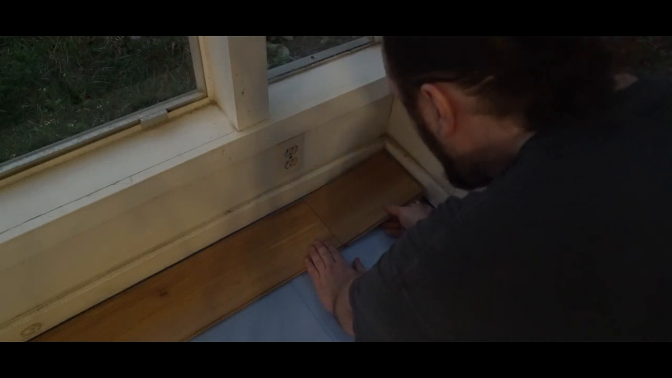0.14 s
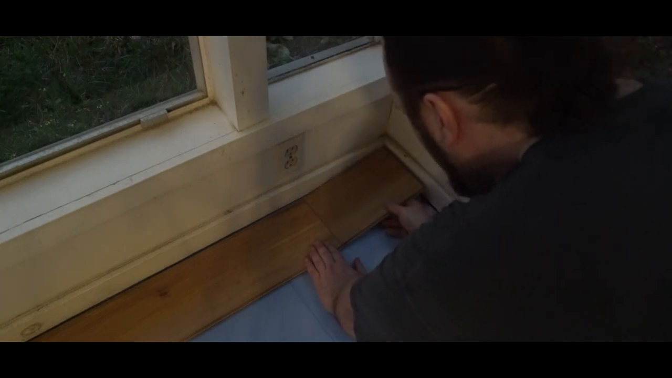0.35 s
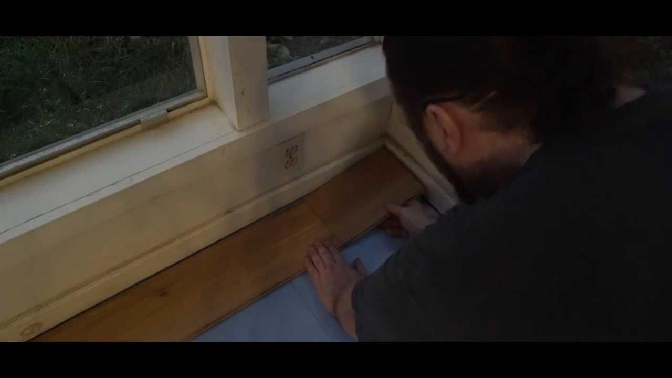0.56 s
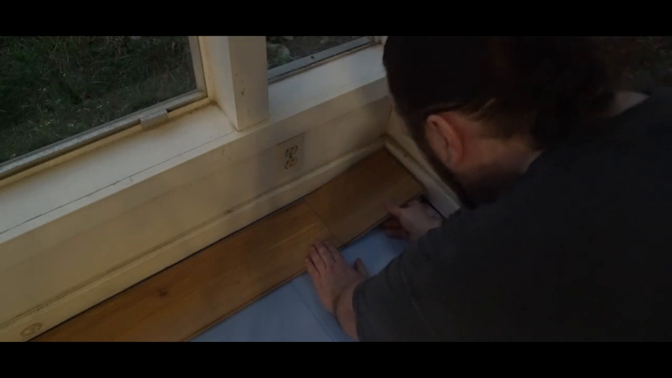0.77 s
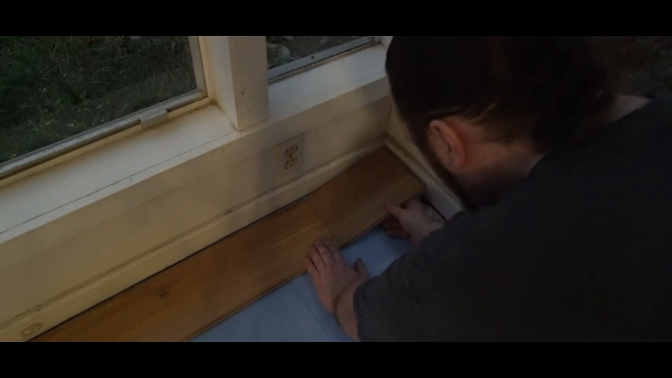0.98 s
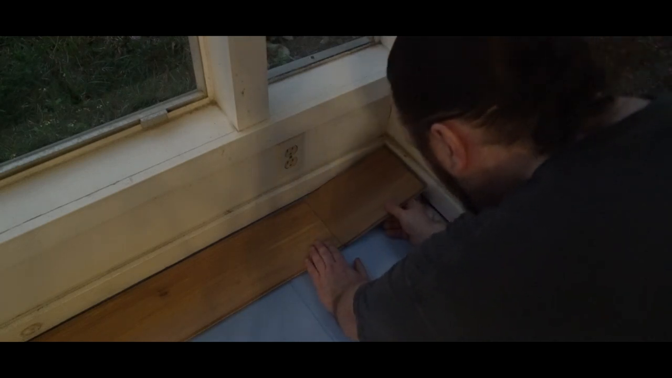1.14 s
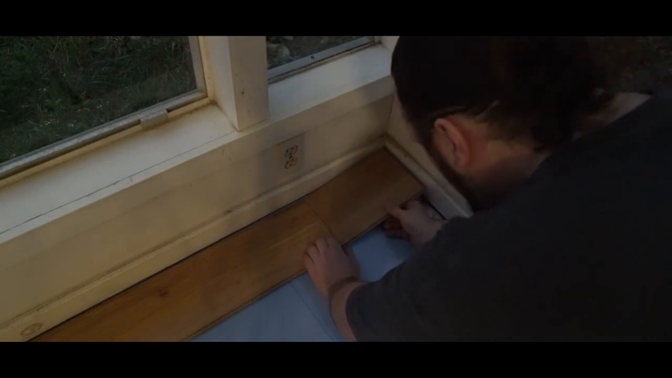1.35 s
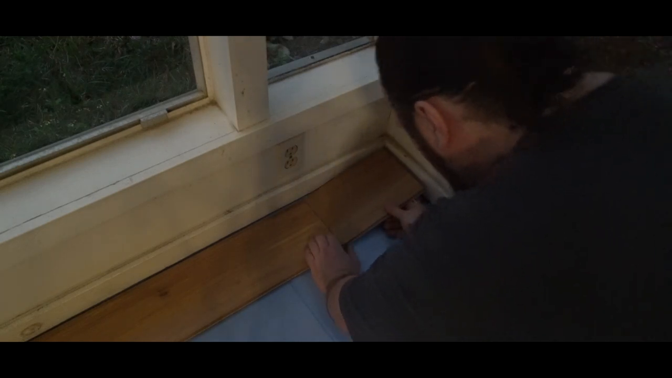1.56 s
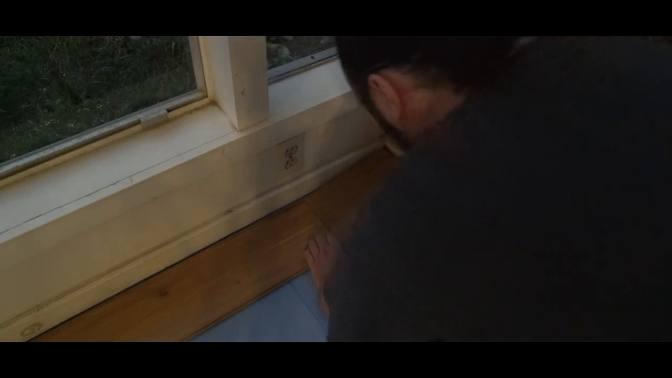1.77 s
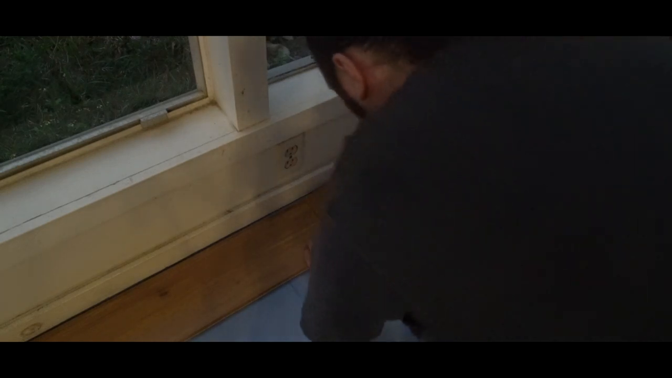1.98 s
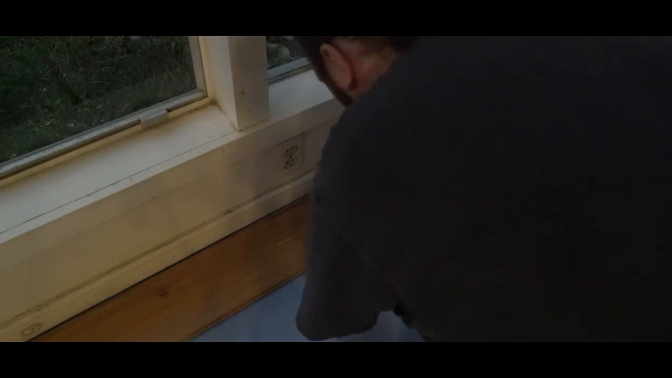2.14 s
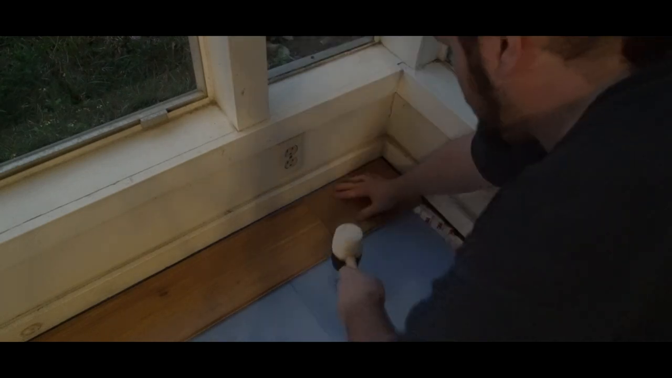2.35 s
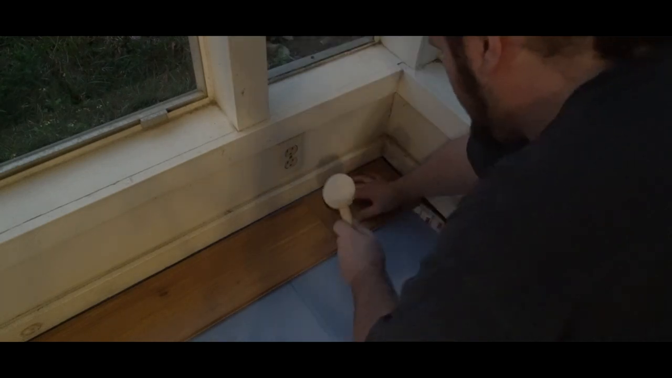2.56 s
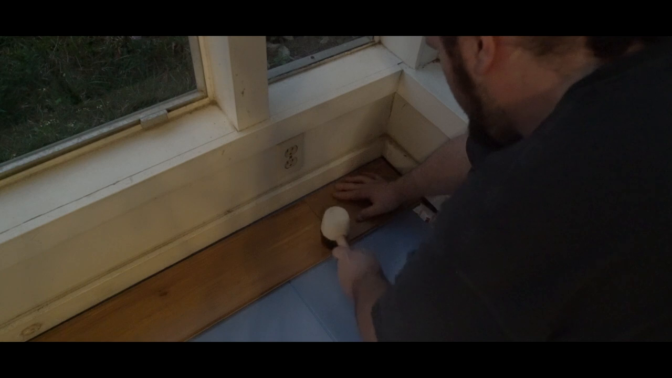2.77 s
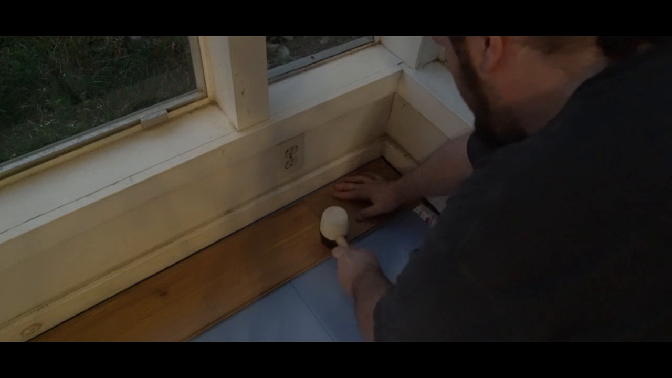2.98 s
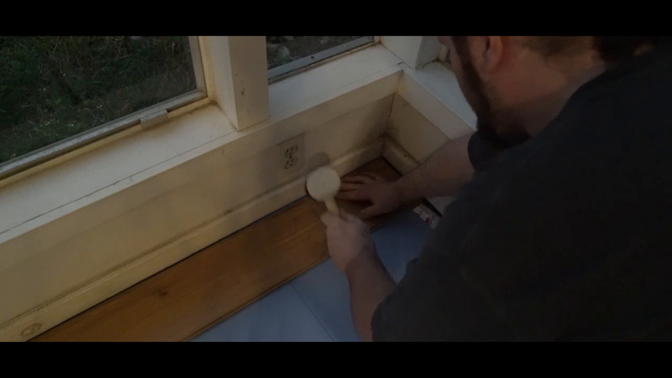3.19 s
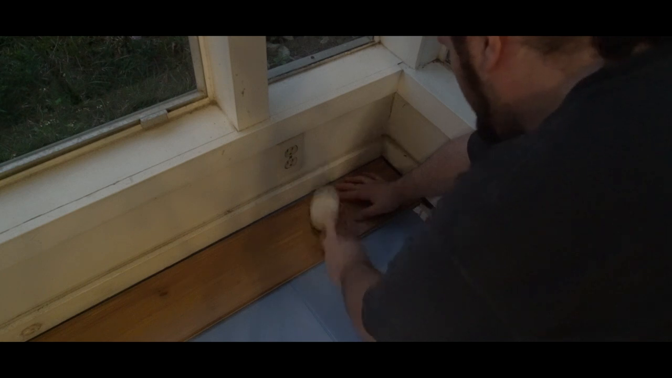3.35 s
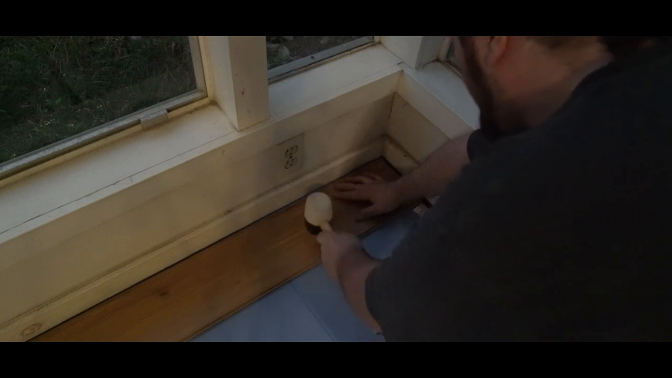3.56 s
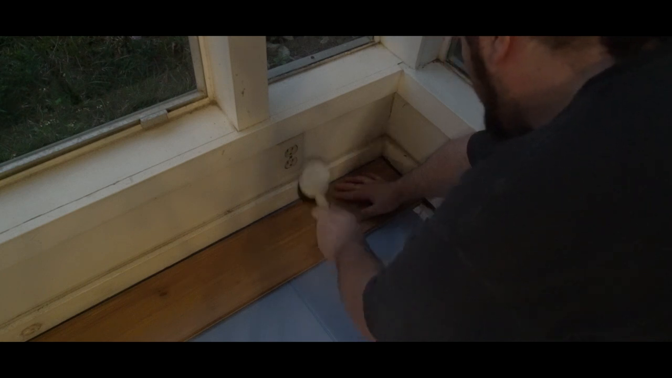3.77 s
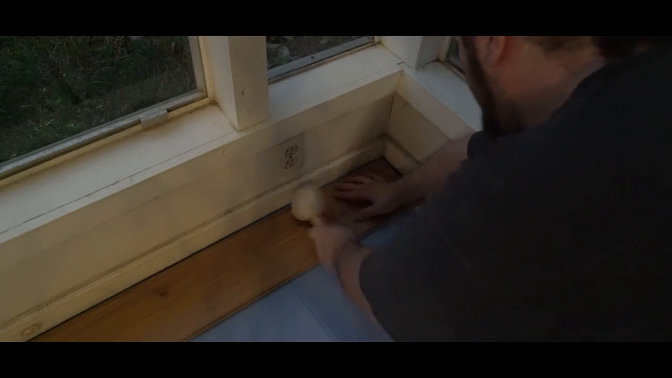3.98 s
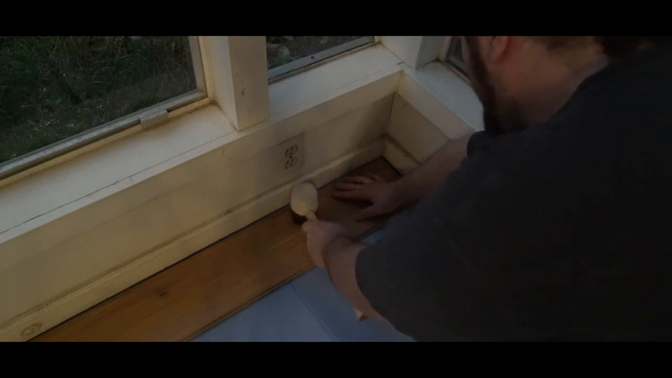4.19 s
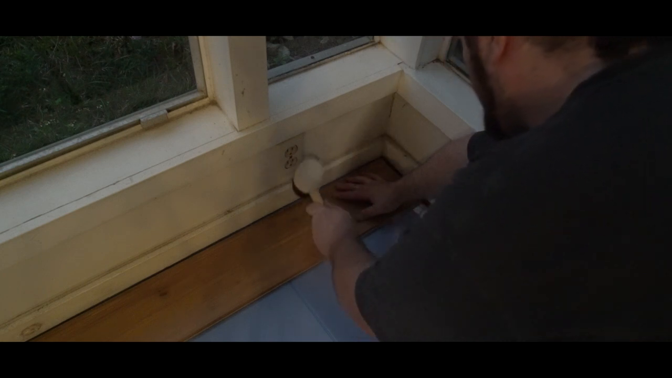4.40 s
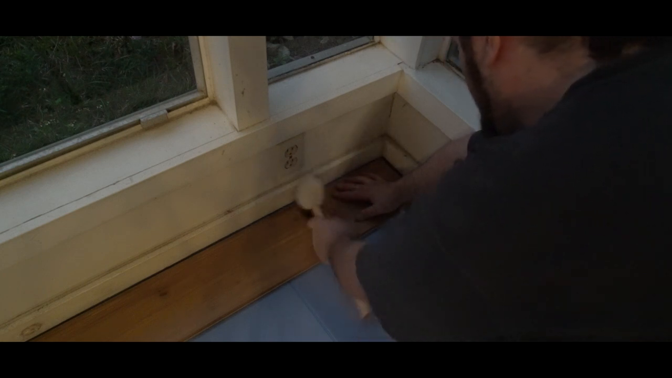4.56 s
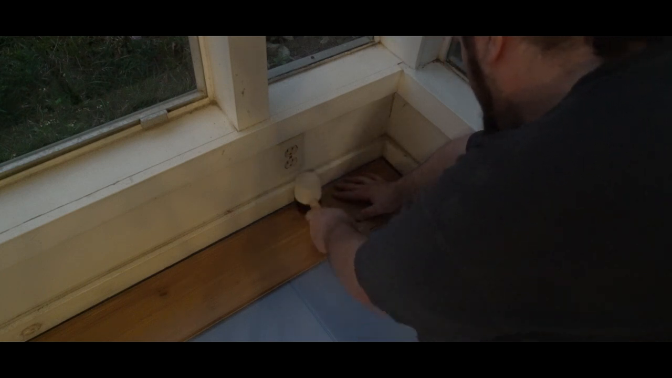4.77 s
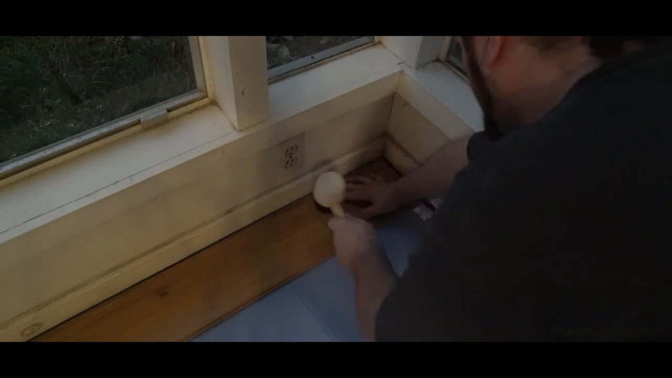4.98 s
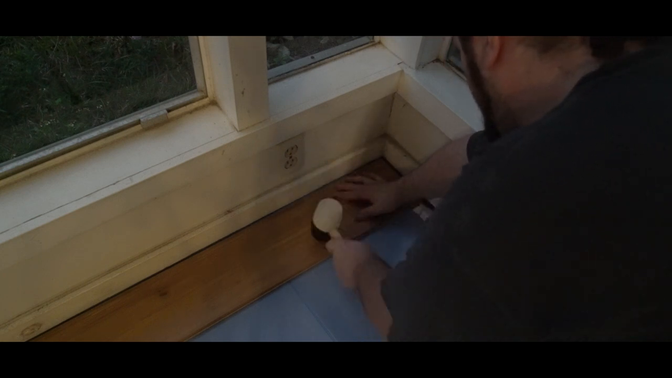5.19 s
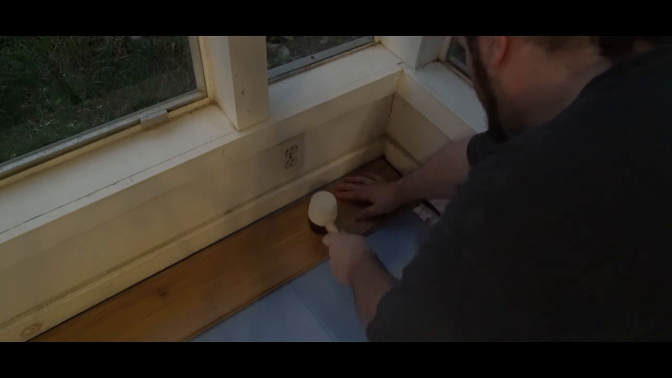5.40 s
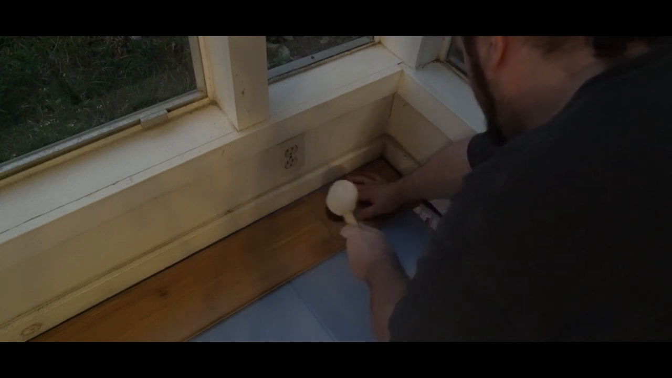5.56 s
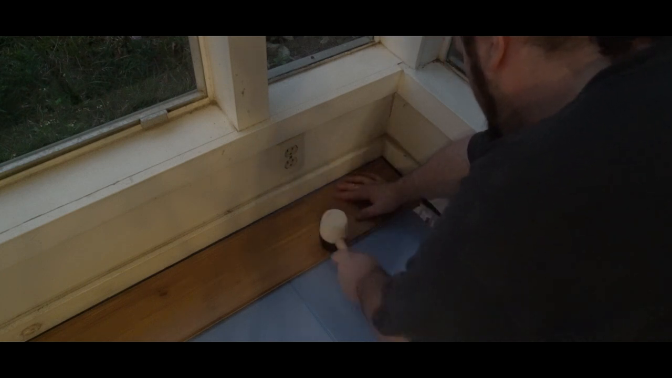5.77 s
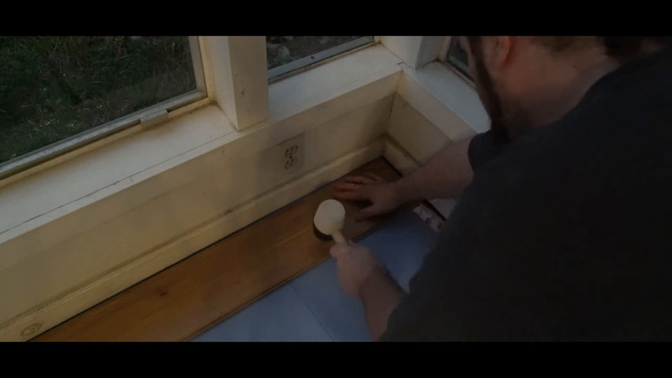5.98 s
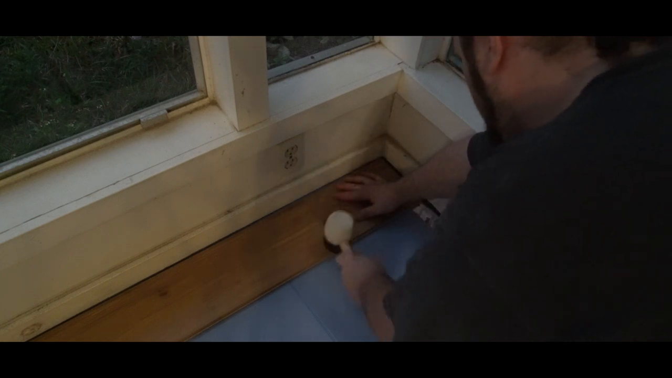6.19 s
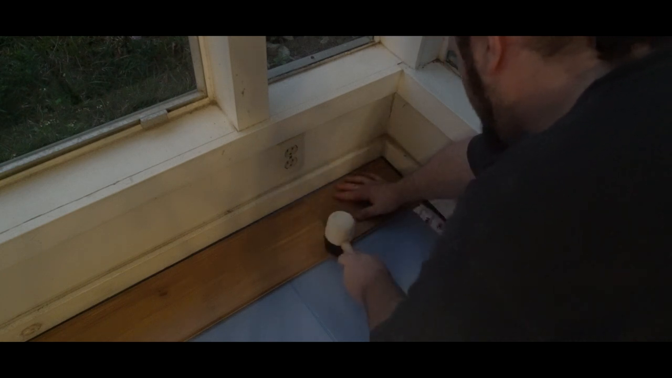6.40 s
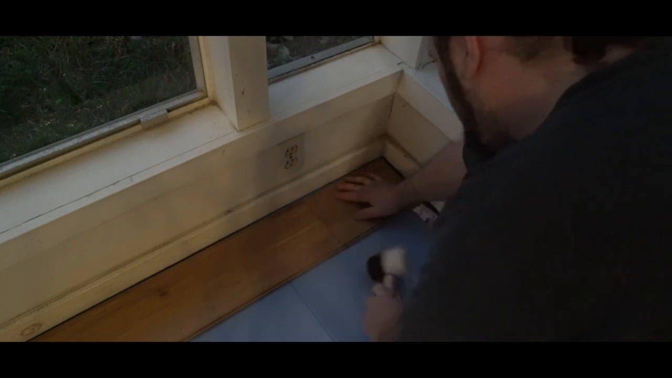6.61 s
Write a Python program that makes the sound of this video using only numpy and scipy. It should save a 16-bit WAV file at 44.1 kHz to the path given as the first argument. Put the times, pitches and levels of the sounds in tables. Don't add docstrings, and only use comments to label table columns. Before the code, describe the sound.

Quiet handling comes first: plank friction squeaks, soft knee thuds, rustling clothes and light wooden ticks over low room tone. Then seven mallet blows on the plank dominate, each a dry, hollow knock with quick corner echoes, wall flutter and a reverberant tail over half a second long. The early blows crack sharply; later ones are weaker and boomier. Recorded close in a hard empty room, the loudest peaks squashed.

```python
import sys
import numpy as np
from scipy import signal
from scipy.fft import rfft, irfft
from scipy.io import wavfile

SR = 44100
rng = np.random.default_rng(int(sys.argv[2]) if len(sys.argv) > 2 else 0)


def dump_mix(stems):
    frames = np.atleast_2d(stems).T
    limited = np.clip(frames, -1, 1)
    pcm = np.round(limited * 32767).astype(np.int16)
    wavfile.write(sys.argv[1], SR, pcm)


def decibels_to_gain(level_db):
    exponent = np.asarray(level_db, float) / 20
    return 10 ** exponent


N = 292779
DROP_S = 2.345


def rms_one(x):
    return x / np.sqrt(np.mean(x ** 2) + 1e-20)


def at_hz(points, hz):
    points = np.array(points)
    return np.interp(np.log(hz), np.log(points[:, 0]), points[:, 1])


def bins_hz(x):
    return np.maximum(np.fft.rfftfreq(len(x), 1 / SR), 1)


def butter(x, order, hz, kind="low"):
    return signal.sosfilt(signal.butter(order, hz, kind, fs=SR, output="sos"), x)


def steep_low(x, hz, order=10, stop_db=40):
    return signal.sosfilt(signal.cheby2(order, stop_db, hz, fs=SR, output="sos"), x)


def ring(force, hz, t60):
    r, w = decibels_to_gain(-60 / (t60 * SR)), 2 * np.pi * hz / SR
    return signal.lfilter([0, np.sin(w)], [1, -2 * r * np.cos(w), r * r], force + 1e-18)


def drone(hz, width_hz):
    return rms_one(ring(rng.standard_normal(N), hz, np.log(1000) / np.pi / width_hz))


def drift(rate_hz):
    return rms_one(butter(rng.standard_normal(N + SR), 2, rate_hz)[SR:])


def coloured(spectrum, white):
    return rms_one(irfft(rfft(white) * decibels_to_gain(at_hz(spectrum, bins_hz(white))), len(white)))


def add(out, x, s):
    i = round(s * SR)
    out[i:i + len(x)] += x[:N - i]


# (frequency [Hz], density [dB per Hz])
AIR = [(20, -21.5), (45, -17.5), (75, -15), (120, -13), (300, -16.5), (520, -27), (720, -14), (800, -23),
       (2000, -26), (5000, -32.5), (9000, -37), (13000, -36), (15600, -39), (16000, -52.5)]
# (frequency [Hz], width [Hz], level [dB])
FAN = [(57, 9, -79), (402, 65, -74.5), (662, 58, -73)]
AIR_DB, AIR_LATE_DB = -70.5, -75.5
HUM_HZ, HUM_DB = 59.5, -70.5


def room_tone():
    t = np.arange(N) / SR
    level_db = np.where(t < DROP_S, AIR_DB, AIR_LATE_DB)
    air = coloured(AIR, rng.standard_normal(N))
    fan = sum(decibels_to_gain(db - AIR_DB) * drone(hz, width_hz) for hz, width_hz, db in FAN)
    hum = decibels_to_gain(HUM_DB - AIR_DB + 1.5 * drift(4)) * np.sin(2 * np.pi * HUM_HZ * t)
    return decibels_to_gain(level_db) * (air + fan + hum)


HANDLING_DROP_DB = 14


def gestures(rows, attack_s, release_db_per_s, rest_db, second=False):
    t, power = np.arange(N) / SR, decibels_to_gain(2 * rest_db)
    for s, length_s, db, other_db in rows:
        rise = np.clip((t - s) / attack_s, 0, 1)
        fall_db = release_db_per_s * np.maximum(t - s - length_s, 0)
        power = power + (rise * decibels_to_gain(db + second * other_db - fall_db)) ** 2
    return np.sqrt(power) * decibels_to_gain(-HANDLING_DROP_DB * (t > DROP_S))


SLIDE_SAG = .07


def sagging(x):
    t, pace = np.arange(N) / SR, np.ones(N)
    for s, length_s, *_ in SLIDES:
        pace += SLIDE_SAG * (.5 - (t - s) / length_s) * (t >= s) * (t < s + length_s)
    return np.interp(np.cumsum(pace), np.arange(N), x)


def sliding_voice(modes):
    voice = np.zeros(N)
    for hz, width_hz, db in modes:
        voice += decibels_to_gain(db + 2.6 * drift(5.8) + 1.5 * drift(18)) * drone(hz, width_hz)
    return voice


# (time [s], length [s], bright level [dB], dull against bright [dB])
SLIDES = [
    (0, 0.11, -69, -14),
    (0.198, 0.083, -76.5, -13),
    (0.407, .06, -75, -12),
    (0.505, .11, -76.5, -7),
    (1.004, 0.13, -79.5, -1),
    (1.26, 0.073, -71.5, -6),
    (1.596, 0.057, -74, -5),
    (1.919, 0.056, -77, -7),
    (2.03, 0.2, -82.5, 3.5),
]
# (time [s], length [s], cloth level [dB], knee against cloth [dB])
SHIFTS = [
    (.02, 0.065, -88, 9),
    (.82, .04, -100, 23),
    (1.22, 0.033, -71.5, -12),
    (1.27, .03, -75, 13.5),
    (1.3, 0.025, -68, 7),
    (1.92, 0.065, -80.5, 1),
    (2.0, 0.26, -88, 6),
    (2.35, .08, -71.5, -12),
]
# (frequency [Hz], width [Hz], level [dB])
BRIGHT_SLIDE = [(1390, 230, -4.5), (3300, 130, -0.5), (4130, 220, 0.5), (4670, 150, -10)]
DULL_SLIDE = [(1090, 53, 1), (2300, 70, 2), (3250, 200, -8.5)]
# (frequency [Hz], density [dB per Hz])
CLOTH = [(530, -41), (900, -36.5), (1660, -11), (1810, -14.5), (2450, -13.5), (2660, -13), (5550, -8.5),
         (16000, -35)]
KNEE = [(71, -46), (120, -11), (199, -1), (265, 3.5), (418, 3), (470, 6.5), (900, -16.5), (1170, -15),
        (1980, -120)]
SLIDE_ATTACK_S, SLIDE_RELEASE_DB_PER_S, SLIDE_REST_DB, DULL_REST_DB = 0.013, 90, -90.5, -93.5
SHIFT_ATTACK_S, SHIFT_RELEASE_DB_PER_S, CLOTH_REST_DB, KNEE_REST_DB = 0.0056, 87, -85.5, -83
CLOTH_FOLLOWS_SLIDE_DB = -13


def handling():
    bright, dull = sliding_voice(BRIGHT_SLIDE), sliding_voice(DULL_SLIDE)
    grains = rng.standard_normal(N) * decibels_to_gain(1.3 * rng.exponential(1, N))
    cloth = coloured(CLOTH, grains) * decibels_to_gain(8.5 + 1.0 * drift(25))
    knee = coloured(KNEE, rng.standard_normal(N))
    slide = SLIDES, SLIDE_ATTACK_S, SLIDE_RELEASE_DB_PER_S
    shift = SHIFTS, SHIFT_ATTACK_S, SHIFT_RELEASE_DB_PER_S
    bright_gain = gestures(*slide, SLIDE_REST_DB)
    dull_gain = gestures(*slide, DULL_REST_DB, second=True)
    cloth_gain = np.hypot(gestures(*shift, CLOTH_REST_DB), decibels_to_gain(CLOTH_FOLLOWS_SLIDE_DB) * bright_gain)
    knee_gain = gestures(*shift, KNEE_REST_DB, second=True)
    return bright_gain * sagging(bright) + dull_gain * dull + cloth_gain * cloth + knee_gain * knee


# (frequency [Hz], density [dB per Hz])
ROOM_COLOUR = [(45, -52.5), (112, -18.5), (172, -10.5), (286, 0), (420, 4), (520, 1.5), (750, 6),
               (1200, 5.5), (2400, 0.5), (4500, -2), (7200, -17.5), (10500, -33.5), (14000, -47),
               (15500, -71)]
# (frequency [Hz], t60 [s])
ROOM_T60 = [(60, 0.168), (160, 0.71), (420, 0.74), (1100, 0.7), (2900, 0.81), (5500, 0.71), (8000, 0.57),
            (11000, 0.49), (14500, 0.4)]
# (frequency [Hz], level [dB], t60 [s])
ROOM_MODES = [(76.6, -24.5, 0.61), (152.6, -22.5, 0.35), (182.4, -23, 0.52), (331.8, -13, 0.68),
              (404, -13.5, 0.64), (526.6, -16.5, 0.53), (617, -16.5, 0.77), (699, -15.5, 0.71),
              (720, -15.5, 0.72), (840, -10, 0.31), (1067, -17.5, 0.25), (984, -14, 0.76),
              (1655, -19.5, 0.91)]
FLUTTER_S, FLUTTER_DB = .0197, 0.5
NEAR_PITCH_DB, NEAR_PITCH_OCTAVES = 3, 0.33


def room_response(white, slap_hz, thud_db, pitch_hz, lift_db, slap_db, crack_db, boom_db=0):
    n, t, hz = len(white), np.arange(len(white)) / SR, bins_hz(white)
    colour_db = at_hz(ROOM_COLOUR, hz)
    colour_db += lift_db * np.exp(-(np.log2(hz / pitch_hz) / 0.2) ** 2)
    colour_db += slap_db * np.exp(-(np.log2(hz / slap_hz) / 0.13) ** 2)
    tilt = [(170, boom_db), (300, thud_db), (600, 0.011), (1200, 0.0044), (6000, crack_db), (14000, crack_db)]
    colour_db += at_hz(tilt, hz)
    spectrum = rfft(white) * decibels_to_gain(colour_db)
    spectrum /= np.sqrt(2 * np.sum(np.abs(spectrum) ** 2)) / n
    out = np.zeros(n)
    for centre_hz in 40 * 2 ** np.arange(0, 9.1, .5):
        share = np.clip(1 - 2 * np.abs(np.log2(hz / centre_hz)), 0, 1)
        out += irfft(spectrum * share, n) * decibels_to_gain(-60 * t / at_hz(ROOM_T60, centre_hz))
    out *= decibels_to_gain(FLUTTER_DB * np.cos(2 * np.pi * (t - .013) / FLUTTER_S) * np.exp(-t / 0.71))
    for mode_hz, level_db, t60 in ROOM_MODES:
        wave = np.sin(2 * np.pi * (mode_hz * t + rng.random()))
        near_db = NEAR_PITCH_DB * np.exp(-(np.log2(mode_hz / pitch_hz) / NEAR_PITCH_OCTAVES) ** 2)
        drive_db = boom_db if mode_hz < 200 else thud_db
        out += decibels_to_gain(level_db + near_db + drive_db + rng.uniform(-6.0, 2.25) - 60 * t / t60) * wave
    return out * (1 - np.exp(-(t / 0.0014) ** 2))


# (time [s], peak [dB], pitch [Hz], tick [dB], rattle length [s])
NUDGES = [(0.079, -53, 1300, -15, 0.0036), (0.947, -72, 4200, 16.5, 0.0025),
          (1.017, -44.5, 1500, -31, 0.0061), (1.074, -45.5, 1390, -16, 0.0078),
          (1.226, -61, 3300, -7, 0.0043), (1.31, -74, 3300, -4, .004), (1.583, -41.5, 1490, -39, 0.012),
          (1.618, -53, 1500, -18, 0.014), (1.938, -59, 1500, -11, .006), (2.4, -73.5, 4030, 6, 0.0034),
          (2.521, -60.5, 2500, -22, 0.0047), (3.348, -55, 4200, -4, 0.0091), (5.47, -64, 4230, 6, 0.002),
          (5.59, -71, 4200, 7, 0.003), (6.625, -69.5, 4200, 6, 0.0046)]
# (frequency [Hz], level [dB], t60 [s])
LOOSE_PLANK = [(980, -13.5, 0.02), (1390, -6, 0.021), (1570, -3.5, 0.0082), (1890, -16.5, 0.01),
               (2290, -10.5, 0.0096), (2970, -4.5, 0.0076), (3330, -3.5, .012), (4334, -13.5, 0.024)]


def nudges():
    out, t = np.zeros(N), np.arange(SR // 5) / SR
    tail = room_response(rng.standard_normal(SR // 2), 3300, -14.0, 1000, 0, 0, 0)
    for s, peak_db, pitch_hz, tick_db, length_s in NUDGES:
        rattle = rng.standard_normal(len(t)) * np.exp(-(t / length_s) ** 2)
        body = np.zeros(len(t))
        for hz, db, t60 in LOOSE_PLANK:
            body += ring(rattle, hz, t60) * decibels_to_gain(db - 6 * abs(np.log2(hz / pitch_hz)))
        body = butter(body, 2, 700, "high")
        tick = butter(rattle, 2, [4000, 11000], "band")
        tap = decibels_to_gain(peak_db) * (body / np.abs(body).max() + decibels_to_gain(tick_db) * tick)
        add(out, tap, s)
        add(out, decibels_to_gain(-7.5) * tap, s + CORNER[1][0])
        add(out, decibels_to_gain(-50.0) * signal.fftconvolve(tap, tail), s)
    return out


# (frequency [Hz], level [dB], t60 [s], share of hardness [ratio])
PLANK = [(177.3, -16.5, 0.073, 0), (342, -19.5, 0.011, 0.24), (628, -7, 0.016, 0), (1300, -3, 0.0079, 0.42),
         (2140, -7, 0.0025, 0.5), (3155, -15.5, 0.016, 0.85), (4050, -14, 0.0038, 0),
         (5030, -11, 0.0049, 0.033), (6070, -7, 0.0035, 0.09), (7650, -12.5, 0.0055, 0.55)]
OVERTONE_HZ = 1705


def blow(pitch_hz, slap_hz, hard_db, click_db, top_hz):
    t = np.arange(SR // 5) / SR
    chatter = rng.standard_normal(len(t)) * np.exp(-t / 0.00082)
    force = 0.26 * decibels_to_gain(hard_db) * butter(chatter, 2, [2500, 6500], "band")
    force[[0, 6]] += [-.3, 1]
    knock = decibels_to_gain(-3.0) * ring(-np.roll(force, 14), pitch_hz, .025)
    knock += decibels_to_gain(-2.5) * ring(force, OVERTONE_HZ, 0.0074)
    knock += decibels_to_gain(hard_db - 11.5) * ring(force, slap_hz, 0.012)
    spread = rng.normal(0, 1, (len(PLANK), 2))
    for k, (hz, level_db, t60, share) in enumerate(PLANK):
        mode = ring(force * (-1) ** k, hz * (1 + .03 * spread[k, 0]), t60)
        knock += mode * decibels_to_gain(level_db + share * hard_db + 2 * spread[k, 1])
    knock = butter(knock, 3, [135, top_hz], "band")
    click = butter(chatter, 3, [7500, 14500], "band")
    return knock / np.abs(knock).max() + decibels_to_gain(click_db) * click / np.abs(click).max()


# (lag [s], level [dB])
CORNER = [
    (.0024, -16.5),
    (.0073, -8),
    (0.0093, -17.5),
    (0.026, -23),
]
CORNER_DB, CORNER_FOLLOWS = -0.7, -0.12


def corner_echoes(out, knock, s, db):
    dulled = butter(knock, 2, 7500)
    for lag_s, echo_db in CORNER:
        level_db = echo_db + CORNER_DB + CORNER_FOLLOWS * db + rng.normal(0, 4.3)
        add(out, dulled * decibels_to_gain(level_db), s + lag_s)


FAR_WALL_S, WALL_DB, WALL_FOLLOWS = .032, -13, 1.24


def far_wall(out, knock, s, db):
    scatter = rng.standard_normal(300) * np.hanning(300) / 10
    add(out, decibels_to_gain(WALL_DB + WALL_FOLLOWS * db) * np.convolve(butter(knock, 2, 6000), scatter), s + FAR_WALL_S)


KNOCK_FLUTTER_DB, KNOCK_FLUTTER_LOSS_DB = -16, 1.8


def flutter(out, knock, s):
    thump = butter(knock, 3, 2600)
    for k, (level_luck, time_luck) in enumerate(rng.normal(0, 1, (12, 2))):
        bounce_db = KNOCK_FLUTTER_DB - KNOCK_FLUTTER_LOSS_DB * k + 2.34 * level_luck
        add(out, decibels_to_gain(bounce_db) * thump, s + .013 + FLUTTER_S * (k + 1) + 0.00147 * time_luck)


# (time [s], strength [dB], plank pitch [Hz], hardness [dB], face click [dB])
BLOWS = [
    (2.7330, 4, 977, 9, -15),
    (3.3785, 2.5, 805, -2, -11),
    (3.9755, -1.5, 772, -5, -20.5),
    (4.5615, 1.5, 762, -5.5, -26.5),
    (5.1318, 0.4, 903, -6, -25),
    (5.6717, -7, 904, -4, -32),
    (6.1674, -3.5, 976, -5.5, -49),
]
PEAK_DB, PEAK_FOLLOWS = -0.83, 0.37
TAIL_DB, LIFT_DB = -18, 2
SLAP_HZ, SLAP_SINKS_HZ_PER_DB, SLAP_DB, SLAP_FOLLOWS = 3740, 42, 1, 0.17
CRACK_DB, CRACK_FOLLOWS = 3, 0.303
SEATING_DULLS_DB_PER_S, SEATING_BOOMS_DB_PER_S = 0.93, 2
WEIGHT_DB, WEIGHT_DB_PER_OCTAVE, WEIGHT_DB_PER_S = -0.9, -18, 0.96
KNOCK_TOP_HZ, TAIL_TOP_HZ = 8600, 14900


def mallet():
    out, shared = np.zeros(N), rng.standard_normal(SR)
    for s, db, pitch_hz, hard_db, click_db in BLOWS:
        seated_s = s - BLOWS[0][0]
        dulled_db = SEATING_DULLS_DB_PER_S * seated_s
        weight_db = WEIGHT_DB + WEIGHT_DB_PER_OCTAVE * np.log2(pitch_hz / 850) + WEIGHT_DB_PER_S * seated_s
        slap_hz = SLAP_HZ - SLAP_SINKS_HZ_PER_DB * (hard_db + 5)
        knock = blow(pitch_hz, slap_hz, hard_db, click_db, KNOCK_TOP_HZ * decibels_to_gain(-.8 * dulled_db))
        knock = knock * decibels_to_gain(PEAK_DB + PEAK_FOLLOWS * db)
        add(out, knock, s)
        corner_echoes(out, knock, s, db)
        far_wall(out, knock, s, db)
        flutter(out, knock, s)
        sparse = decibels_to_gain(2.0 * rng.exponential(1, SR) * np.exp(-np.arange(SR) / SR / 0.086))
        white = (0.66 * shared + 0.86 * rng.standard_normal(SR)) * sparse
        slap_db = SLAP_DB + SLAP_FOLLOWS * hard_db
        crack_db = CRACK_DB + CRACK_FOLLOWS * (db + hard_db) - dulled_db
        boom_db = SEATING_BOOMS_DB_PER_S * seated_s - 3.0
        tail = room_response(white, slap_hz, weight_db, pitch_hz, LIFT_DB, slap_db, crack_db, boom_db)
        add(out, decibels_to_gain(TAIL_DB + db) * steep_low(tail, TAIL_TOP_HZ), s)
    return butter(out, 4, 95, "high")


QUIET_TOP_HZ = 13300


def scene():
    quiet = room_tone() + handling() + nudges()
    dulled = steep_low(quiet, QUIET_TOP_HZ)
    return (mallet() + np.where(np.arange(N) / SR < DROP_S, quiet, dulled))[None]


def top_cut(x):
    return signal.sosfilt(signal.butter(12, 16880, fs=SR, output="sos"), x)


DUCK_DB, DUCK_FOLLOWS = 4, 0.54
OVERLOAD = .74


def record(dry):
    t, duck_db = np.arange(N) / SR, np.zeros(N)
    for s, db, *_ in BLOWS:
        depth_db = max(DUCK_DB + DUCK_FOLLOWS * db, 0)
        duck_db += np.interp(t - s, [.002, .012, .024, .04], [0, depth_db, depth_db, 0])
    loud = dry * decibels_to_gain(-duck_db)
    clipped = loud / (1 + np.abs(loud / OVERLOAD) ** 6) ** (1 / 6)
    clipped = loud + butter(clipped - loud, 2, 120, "high")
    finished = steep_low(clipped, 16900, order=12, stop_db=60)
    return top_cut(finished)


dry = scene()
out = record(dry)
dump_mix(out)
```